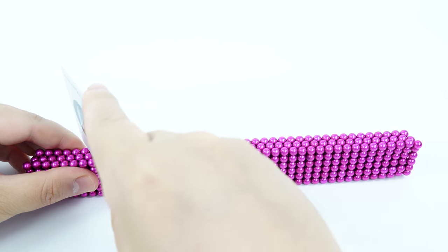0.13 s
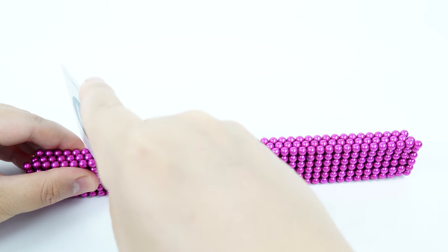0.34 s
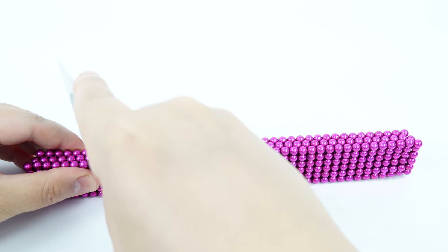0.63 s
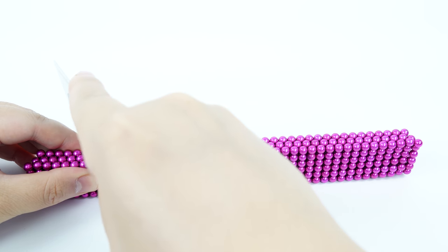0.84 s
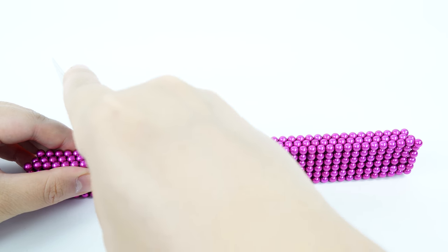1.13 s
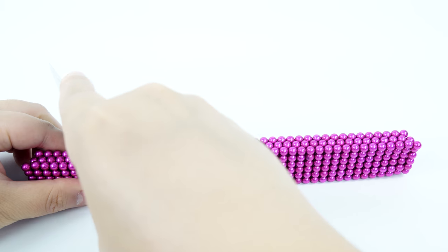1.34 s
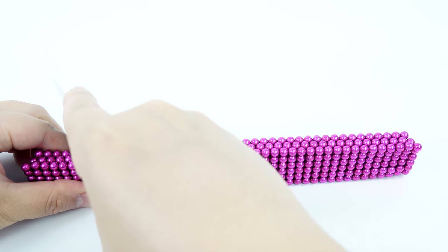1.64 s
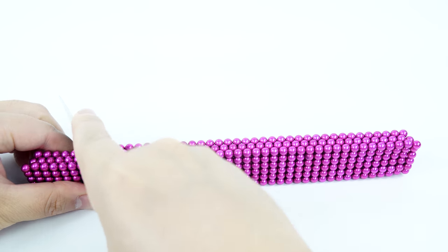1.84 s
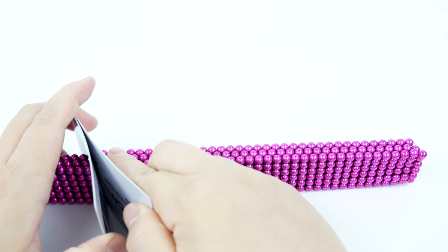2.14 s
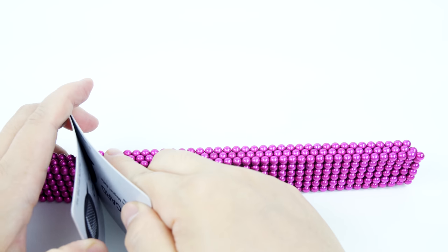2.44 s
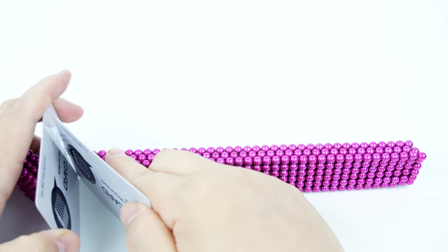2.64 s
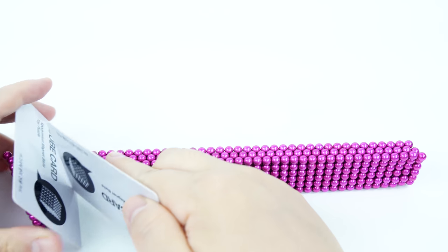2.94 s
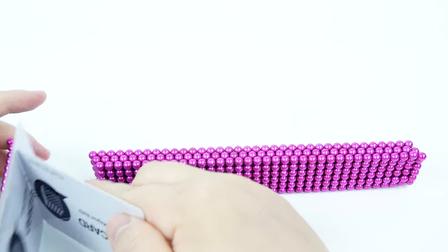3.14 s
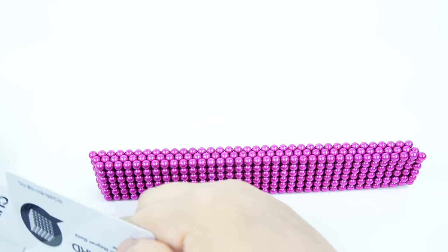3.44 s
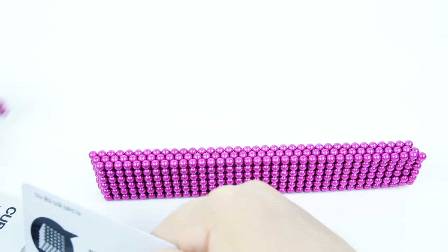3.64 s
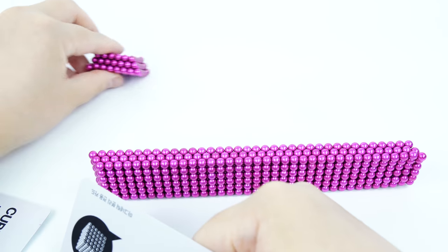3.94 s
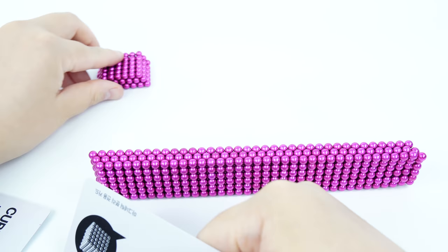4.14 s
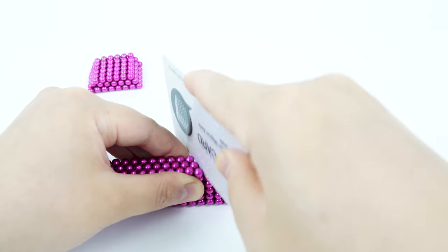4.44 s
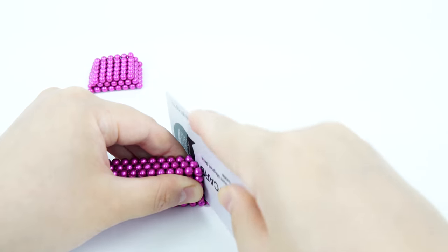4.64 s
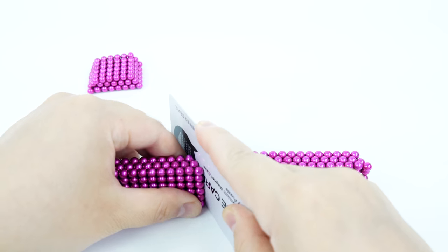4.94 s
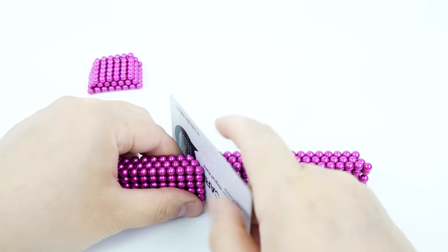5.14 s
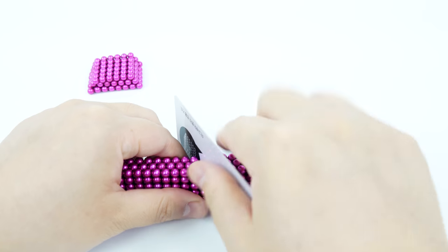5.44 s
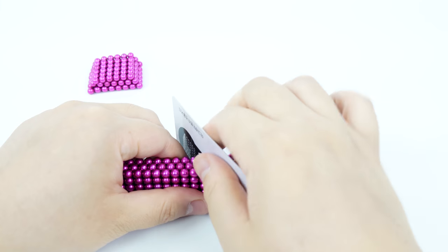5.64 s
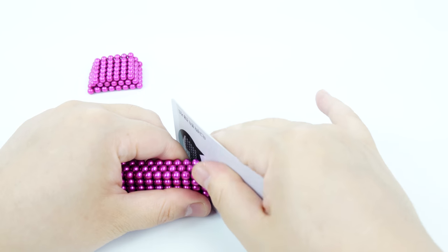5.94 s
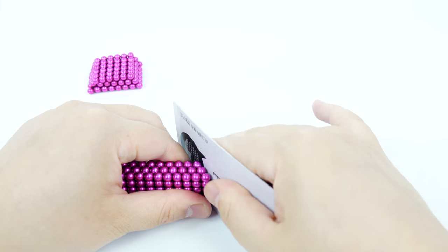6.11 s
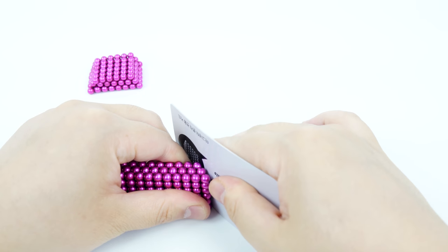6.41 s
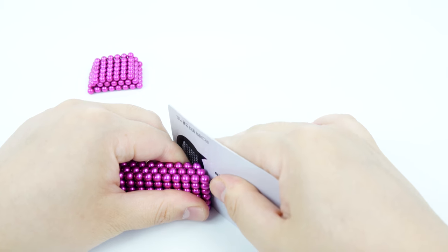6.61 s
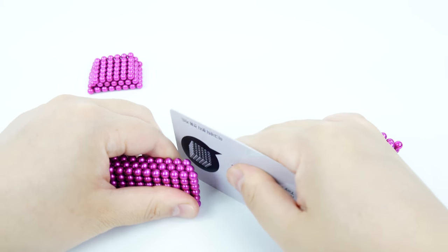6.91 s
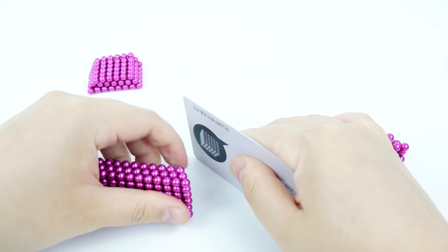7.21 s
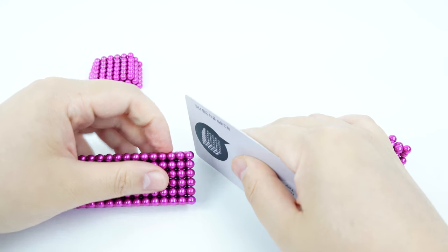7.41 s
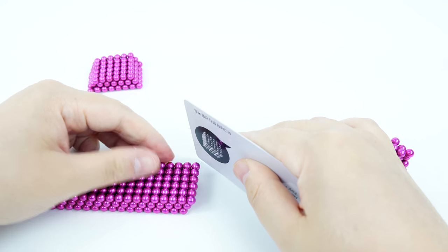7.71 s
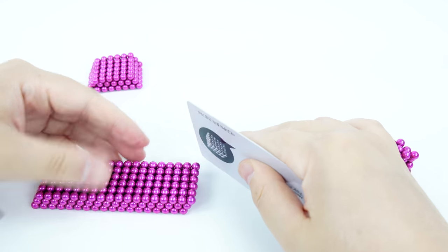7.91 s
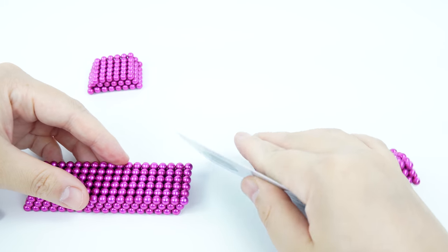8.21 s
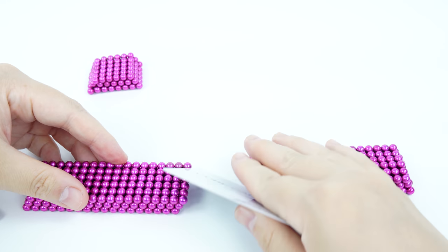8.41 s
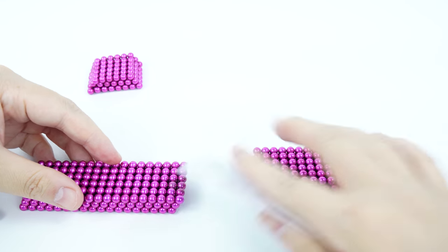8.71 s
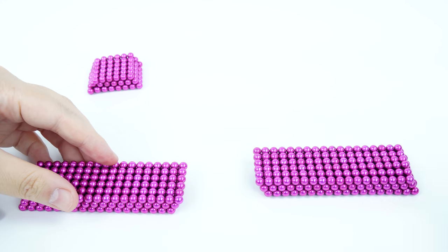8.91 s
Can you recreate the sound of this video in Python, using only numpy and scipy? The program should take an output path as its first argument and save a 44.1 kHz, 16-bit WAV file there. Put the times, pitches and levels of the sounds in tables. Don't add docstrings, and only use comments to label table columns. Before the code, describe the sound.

Close microphone in a small quiet room. Card and skin rustle faintly, then a light knock and a loud crunchy clack as rows of magnetic steel balls part. Soft sliding and small flicks follow, then hard snaps as a piece closes and is set down, a thumping cluster of clacks, a long quiet stretch with tiny ticks, a firm dull knock, and the loudest snap. Light flicks finish it.

```python
import sys
import numpy as np
from scipy import signal
from scipy.fft import rfft, irfft, next_fast_len
from scipy.io import wavfile
from scipy.ndimage import map_coordinates

SR = 44100
rng = np.random.default_rng(int(sys.argv[2]) if len(sys.argv) > 2 else 0)


def elevation(decibels):
    levels = np.asarray(decibels, float)
    return 10 ** (levels / 20)


def log_audio(samples):
    frames = np.atleast_2d(samples).T
    limited = np.clip(frames, -1, 1)
    pcm = np.round(limited * 32767).astype(np.int16)
    wavfile.write(sys.argv[1], SR, pcm)


N = 399546


def unit(x):
    return x / np.sqrt(np.mean(x ** 2) + 1e-20)


def peak(x):
    return x / (np.abs(np.atleast_2d(x)[0]).max() + 1e-20)


def along(points, hz):
    f, v = np.transpose(points)
    return np.interp(np.log(hz + 1), np.log(f + 1), v)


def filtered(x, response):
    m = next_fast_len(x.shape[-1] + 2048)
    spectrum = rfft(x, m) * response(np.fft.rfftfreq(m, 1 / SR))
    return irfft(spectrum, m)[..., :x.shape[-1]]


def resonance(f, hz, width_hz):
    return 1j * f * width_hz / (hz * hz - f * f + 1j * f * width_hz)


def low_pass(f, hz):
    return 1 / (1 + 1j * f / hz) ** 2


def wobble(rate_hz):
    knots = rng.standard_normal(int(N * rate_hz / SR) + 4)
    return map_coordinates(knots, [np.arange(N) * rate_hz / SR])


def moving_band(centre_hz, rel_width, skirt_db, skirt_hz):
    f, t, z = signal.stft(rng.standard_normal(N), SR, nperseg=1024)
    f = f[:, None]
    c = centre_hz[np.minimum((t * SR).astype(int), N - 1)]
    band = np.abs(resonance(f, c, rel_width * c)) ** 2
    skirt = np.abs(resonance(f, skirt_hz, 2 * skirt_hz)) ** 2
    gain = band + elevation(skirt_db) * skirt
    gain = gain / np.sqrt(np.mean(gain ** 2, 0))
    return unit(signal.istft(z * gain, SR, nperseg=1024)[1][:N])


def strokes(rows):
    roundness = 1.2
    t = np.arange(0, N / SR + .01, .001)
    power = 0
    for s, db, *_, rise_s, fall_s in rows:
        away = np.maximum((s - t) / abs(rise_s), (t - s) / abs(fall_s))
        power = power + elevation(db - 20 * away ** roundness) ** 2
    return np.interp(np.arange(N) / SR, t, np.sqrt(power))


def centre(rows):
    s, _, hz, *_ = np.transpose(rows)
    return np.interp(np.arange(N) / SR, s, hz)


def air():
    # pitch_hz, level_db (per Hz)
    air_spectrum = [(11, -26), (18, 1), (49, -8.5), (121, -0.5), (190, -12), (213, -12.5), (300, -7),
                    (410, -12.5), (472, -15), (765, -21), (1050, -24), (1390, -31.5), (1600, -30.5),
                    (3650, -46.5), (16000, -65)]
    level_db = -59
    noise = filtered(rng.standard_normal(N), lambda f: elevation(along(air_spectrum, f)))
    return elevation(level_db + 0.2 * wobble(3)) * unit(noise)


def rustle():
    # peak_s, level_db, rise_s,
    # fall_s
    rustle_strokes = [(.04, -73, 0.24, 0.79), (.3, -78.5, 1, 0.48), (1.34, -76.5, .006, 0.31),
                      (1.52, -72, 0.1, 0.3), (1.874, -78, 0.83, 0.46), (2.07, -72.5, .006, 1.5),
                      (3.17, -72.5, 0.52, 0.45), (3.52, -61.5, 0.28, 0.22), (4.17, -79, 1.6, 0.59),
                      (4.47, -76, .5, .35), (4.71, -67, 0.15, 0.33), (5.1, -86, 0.46, 3.4),
                      (7.1, -94.5, .5, 0.96), (7.9, -81, 0.26, .5), (8.72, -81.5, 0.29, 7.9)]
    hiss = moving_band(np.full(N, 6330), 0.74, skirt_db=9.5, skirt_hz=7000)
    grain = elevation(0.95 * wobble(120) - 3.0)
    return strokes(rustle_strokes) * grain * hiss


def squeaks():
    # start_s, length_s, pitch_hz, width (share of pitch), level_db
    squeak_rows = [(1.357, 0.074, 2296, 0.71, -75), (2.068, 0.26, 2620, 1.3, -78.5),
                   (4.559, 0.083, 410, 0.17, -27.5), (2.998, 0.045, 1470, 0.2, -67),
                   (3.083, 0.11, 1430, 0.53, -60), (3.306, 0.13, 2240, 0.21, -70),
                   (3.379, 0.18, 6600, 0.36, -69.5), (3.18, 0.056, 10300, 0.18, -55),
                   (3.393, 0.12, 10700, .15, -81), (3.484, 0.08, 6900, 0.21, -61),
                   (3.988, 0.059, 1110, .3, -35.5), (4.569, 0.053, 1050, 0.14, -30.5),
                   (4.589, 0.068, 3020, .3, -38.5), (4.705, 0.065, 1500, 0.56, -49),
                   (6.809, .03, 4000, 0.16, -45), (3.57, 0.077, 2160, 0.11, -56.5),
                   (4.793, 0.068, 1890, 0.41, -29.5), (6.283, 0.096, 2715, 0.22, -68),
                   (6.3, 0.078, 1610, 0.71, -68), (6.312, 0.065, 5600, .7, -82),
                   (6.395, 0.036, 5950, 0.42, -86), (6.441, 0.087, 1660, 0.26, -66),
                   (6.44, 0.084, 2840, 0.12, -72.5), (7.9, 0.2, 1380, 0.26, -71.5),
                   (8.081, 0.16, 622, 0.5, -58), (8.087, 0.14, 1360, 0.4, -66),
                   (8.075, 0.15, 2086, 0.35, -71), (8.408, 0.1, 2306, 0.81, -71.5),
                   (8.73, 0.35, 5720, 0.43, -72.5), (8.73, 0.35, 8200, 0.26, -76.5),
                   (8.7, .4, 2167, 1.6, -78.5), (6.811, .06, 1950, .22, -40), (6.815, .07, 6500, .2, -54),
                   (7.995, .075, 1380, .2, -66), (7.995, .07, 2150, .3, -72), (0.0, .12, 1900, .6, -76),
                   (4.54, .2, 12500, .3, -70), (1.43, .1, 13000, .3, -78), (8.57, .16, 12500, .3, -84),
                   (2.55, .12, 12500, .3, -86)]
    catch_s, slip_s = .008, 0.047
    out = np.zeros(N + SR)
    for s, length_s, hz, width, db in squeak_rows:
        n = round(length_s * SR)
        t = np.arange(n) / SR
        tone = unit(filtered(rng.standard_normal(n), lambda f: resonance(f, hz, 1.25 * width * hz) ** 3))
        fade = np.minimum(1, np.minimum(t / catch_s, (length_s - t) / slip_s))
        out[round(s * SR):][:n] += elevation(db) * fade * tone
    return out[:N]


def room_tail(length):
    # pitch_hz, t60_s
    decay = [(100, 0.26), (1000, 0.21), (2500, 0.245), (3800, 0.245), (5200, 0.2), (8000, 0.205),
             (12000, 0.17)]
    # pitch_hz, level_db
    reflected = [(100, -5), (450, -3), (750, -6), (1100, -0.5), (1480, -9.5), (1900, -1), (2500, -3),
                 (8000, -2.5)]
    hz, t, z = signal.stft(rng.standard_normal(length), SR, nperseg=256)
    t60_s = along(decay, hz)[:, None]
    uneven_db = 3.0 * rng.standard_normal((len(hz), 1)) - 0.9
    gain = elevation(uneven_db + along(reflected, hz)[:, None] - 60 * t / t60_s) / np.sqrt(t60_s)
    tail = signal.istft(z * gain, SR, nperseg=256)[1][:length]
    return np.pad(tail, (round(.003 * SR), 0)) * np.sqrt(6 * np.log(10) / SR)


def snaps(rows):
    # pitch_hz, level_db, t60_s
    table_modes = [(238, -1.5, 0.6), (276, 4.5, 0.4), (401, -1.5, 0.4), (448, -6.5, .3), (590, -3, 0.3),
                   (692, -10, 0.25), (775, -9.5, 0.25), (971, -7.5, 0.25), (1119, -7.5, 0.25),
                   (1280, -11.5, 0.25), (1333, -9.5, 0.25), (1618, -14.5, .2), (1710, -14, .2)]
    span, arrival_s = 12288, .0006
    thump_hz, thump_t60_s = 113.7, 0.19
    out = np.zeros(N + 3 * span)
    t = np.arange(span // 2) / SR
    table = np.array([elevation(g - 60 * t / min(0.4 * t60, .2)) * np.sin(-2 * np.pi * hz * t)
                      for hz, g, t60 in table_modes])
    thump = elevation(-60 * t / thump_t60_s) * np.sin(2 * np.pi * thump_hz * t)
    thump *= 1 - np.exp(-t / 0.0025)

    def tick_band(f):
        return (resonance(f, 7100, 2600) ** 2 - 0.8 * resonance(f, 9900, 2400) ** 2) * low_pass(f, 14000)

    def knock_band(f):
        return resonance(f, 360, 1100) ** 2 * low_pass(f, 2500)

    for s, db, ring_hz, thump_db, knock_db, tick_db in rows:
        def block(f):
            ring = resonance(f, ring_hz, 0.35 * ring_hz) + 0.27 * resonance(f, ring_hz, 0.42 * ring_hz)
            return ring * low_pass(f, 2.1 * ring_hz) * low_pass(f, 4 * ring_hz)

        burst = rng.standard_normal(len(t)) * elevation(-60 * t / 0.014)
        burst[:3] -= 2.05
        blow = np.array([burst, np.linalg.norm(burst) * (t == 0)])
        snap = peak(filtered(blow, block))
        tick = peak(filtered(blow * elevation([[0], [-4]] - 60 * t / 0.003), tick_band))
        modes = elevation(2.5 * rng.standard_normal(len(table_modes))) @ table
        knock = peak(0.6 * peak(modes) - peak(filtered(blow[[1, 1]] + 0.36 * blow, knock_band)))
        mix = elevation(-3.5) * snap + elevation(tick_db) * tick + elevation(knock_db - 1.5) * knock
        mix = mix + elevation(thump_db - 2.5) * thump * [[1], [.25]]
        near, spread = elevation(db) * mix
        far = signal.fftconvolve(spread, room_tail(span if db > -45 else span // 3))
        start = round((s + arrival_s) * SR)
        out[start:][:len(near)] += near
        out[start:][:len(far)] += far
    return out[:N]


def contacts():
    # start_s, snap_db, ring_hz, thump_db, knock_db
    touch_rows = [
        (0.59, -62, 5000, -40, -20),
        (0.0244, -49, 7000, -30.5, -28),
        (1.4321, -33, 1300, 10.5, 10.5),
        (1.9228, -45.5, 2900, 12, 4.5),
        (3.5964, -48, 8960, 1, -16),
        (4.5395, -35.5, 1710, 20, 17),
        (5.0364, -55.5, 6500, -8, 7.5),
        (8.4624, -58, 1604, -12.5, 8),
    ]
    # start_s, snap_db, ring_hz
    flick_rows = [(1.4325, -37, 4460), (1.9232, -41.5, 13730), (3.5947, -40, 11000), (3.6005, -53, 11500),
                  (2.5456, -39.5, 5630), (2.729, -59, 4460), (3.5593, -26, 5030), (3.5682, -27, 5350),
                  (3.569, -31, 10800), (3.6794, -48.5, 5240), (8.4931, -47, 6600), (8.5749, -34.5, 6030),
                  (8.577, -44, 3480), (8.6867, -25.5, 5320), (8.688, -54, 3420), (3.209, -35, 6000),
                  (3.2435, -37.5, 7000), (3.5597, -34, 11000)]
    # start_s, snap_db, ring_hz, thump_db, knock_db
    pad_rows = [
        (1.4245, -44, 345, 18, -25),
        (1.785, -45.5, 499, 4.5, -21.5),
        (4.5325, -34.5, 444, 7.5, -6),
        (4.5625, -21, 586, 7, -8),
        (4.7808, -42, 398, 12.5, -17.5),
        (6.793, -49, 1600, -10, -0.5),
        (6.8035, -40.5, 1490, -17.5, 11),
        (6.838, -30, 2100, -27, 12.5),
    ]
    # start_s, snap_db, ring_hz, thump_db, knock_db
    clack_rows = [(1.4696, -37.5, 2900, 2.5, 10), (1.7945, -18, 2450, -0.5, -4),
                  (1.8113, -7, 4810, -16, -7), (3.1692, -19.5, 1950, -52, -7.5),
                  (3.9871, -8, 1900, -24.5, -4), (4.1826, -7.5, 450, -14, -6), (4.5735, -28, 1066, -1, 2),
                  (4.5775, -16.5, 2920, 4.5, 3.5), (4.5824, -16, 2800, -18.5, -3),
                  (4.6014, -20.5, 2400, 0, -8), (4.7075, -28.5, 1890, -2.5, -5.5),
                  (4.718, -40, 1960, -3, -2), (4.7939, -12.5, 1840, -14.5, -21),
                  (4.799, -15, 1770, -16, -32), (4.8064, -13.5, 1903, -8, -29),
                  (6.8124, -24, 1982, -38, -6), (7.666, -7, 1400, -7.5, 3.5),
                  (7.6757, -7.5, 1300, -12, -4.5)]
    # start_s, snap_db, ring_hz, thump_db, knock_db
    snap_rows = [(1.8064, -24, 2600, -5, -5), (1.8174, -15, 5230, -19, -15), (3.2071, -34, 1450, -29, -22),
                 (3.2198, -35.5, 3020, -17, 7), (3.2424, -40, 1520, -21, -7),
                 (4.1808, -13.5, 4530, -21, -7.5), (4.1824, -3, 2660, -21, -8),
                 (4.5921, -17, 2750, -8.5, -1.5), (7.654, -8, 2300, -12.5, 0),
                 (7.66, -16.5, 1000, -12.5, -0.5), (7.657, -20.5, 2500, -14, -4),
                 (7.6613, 2, 2810, -5.5, -6.5)]
    # start_s, snap_db, ring_hz
    shift_rows = [(2.0694, -57.5, 1340), (2.316, -66, 4100), (2.6024, -60.5, 1434), (2.6194, -46, 1900),
                  (2.83, -54.5, 1423), (4.3744, -59.5, 1608), (5.1744, -62.5, 5480), (5.1886, -54, 1356),
                  (5.24, -51, 1589), (6.2836, -55, 2910), (6.3175, -56.5, 6230), (6.3294, -56, 2910),
                  (6.3979, -55, 6000), (6.4428, -49, 1670), (6.4687, -59, 1650), (6.5004, -61.5, 5960),
                  (6.5854, -67, 2780), (8.4103, -55, 2190), (6.7785, -56, 1560), (3.855, -63, 4960),
                  (3.282, -62, 7500), (3.31, -50, 6500)]
    # the missing ones of thump_db, knock_db, tick_db
    kinds = [(snap_rows, [-16]), (clack_rows, [-29.5]), (touch_rows, [-6]),
             (flick_rows, (-20.5, -14, -15.5)), (shift_rows, (-2.5, 6, -10.5)), (pad_rows, [-37])]
    return snaps([(*row, *mix) for rows, mix in kinds for row in rows])


def small_contacts():
    # start_s, snap_db, ring_hz, knock_db
    small_rows = [(3.9888, -20, 1150, -8), (3.9888, -38, 8900, -20), (3.9928, -28, 5100, -20),
                  (3.9932, -40, 8900, -20), (3.9995, -22, 900, 0), (3.9995, -42, 10500, -20),
                  (1.4325, -40, 6400, -20), (1.434, -36, 2000, -15), (1.4696, -50, 6700, -20),
                  (1.4765, -56, 6700, -20), (7.6618, -26, 9800, -20), (7.66, -13, 600, -4),
                  (1.8005, -40, 6000, -20), (1.8075, -36, 6900, -20), (4.1812, -30, 8200, -20),
                  (2.316, -60, 4100, -20), (4.578, -36, 9700, -20), (4.5827, -38, 9900, -20),
                  (4.5932, -40, 9700, -20), (4.5635, -38, 2800, -20), (4.5705, -44, 6000, -20),
                  (4.533, -56, 6000, -20), (0.0244, -48, 4800, -20), (7.669, -14, 1600, -3),
                  (8.255, -60, 200, 6), (3.9935, -30, 4300, -20), (4.5395, -44, 13500, -20),
                  (4.578, -40, 13500, -20), (1.4325, -48, 13500, -20), (1.4696, -52, 13000, -20),
                  (7.6618, -34, 13000, -20), (1.9228, -46, 3000, -6)]
    thump_db, tick_db = -30, -30
    return snaps([(s, db, hz, thump_db, knock_db, tick_db) for s, db, hz, knock_db in small_rows])


def drags():
    # peak_s, level_db, centre_hz, rise_s, fall_s
    drum_strokes = [(1.81, -29, 280, 0.022, 0.024), (1.924, -32, 194, 0.0035, 0.061),
                    (2.625, -43, 267.8, 0.021, 0.16), (2.695, -38.5, 236, 0.092, 0.04),
                    (3.18, -37, 235, 0.0064, 0.19), (3.356, -36.5, 247, 0.088, 0.089),
                    (3.605, -35.5, 224.1, 0.043, 0.02), (4.066, -35.5, 310.9, 0.084, 0.043),
                    (4.154, -34.5, 324.7, 0.042, 0.046), (4.2, -22, 400, 0.014, 0.03),
                    (4.306, -34.5, 298, 0.076, 0.061), (4.545, -27, 210.7, 0.012, 0.03),
                    (4.58, -20, 225, 0.026, 0.018), (5.196, -55.5, 263.7, 0.031, 0.073),
                    (6.404, -54, 291, 0.02, 0.064), (6.478, -58, 270, 0.077, .06),
                    (6.825, -31, 300, 0.019, 0.16), (6.87, -24.5, 350, 0.048, 0.079),
                    (7.35, -44.5, 220, 0.052, 0.11), (7.97, -59, 260, 0.098, 0.18),
                    (8.265, -43.5, 330, 0.029, 0.16), (8.31, -40, 240, 0.083, 0.085)]
    # peak_s, level_db,
    # centre_hz, rise_s, fall_s
    scrape_strokes = [(1.81, -29, 1578, 0.0075, 0.033), (2.622, -48, 1082, 0.019, 0.087),
                      (3.18, -45, 1641, 0.012, 0.15), (3.6, -59, 2214, 0.19, 0.12),
                      (4.03, -40, 1550, 0.039, 0.049), (4.2, -38.5, 2143, 0.0054, 0.1),
                      (4.545, -38, 881, 0.0053, .06), (4.585, -30.5, 958, 0.026, 0.027),
                      (5.196, -70, 1140, 0.03, .035), (5.238, -66, 1152, 0.005, 0.033),
                      (6.43, -67, 1494, 0.086, 0.047), (6.83, -39.5, 1940, 0.033, .06),
                      (6.86, -38.5, 1302, 0.034, 0.084), (7.72, -39, 1496, .04, 0.12),
                      (7.96, -69, 1180, 0.38, 0.24), (8.14, -66.5, 1219, 0.059, .08)]
    # peak_s, level_db, rise_s, fall_s
    push_strokes = [(1.48, -39, 0.065, 0.069), (1.79, -25, 0.0074, 0.038), (1.922, -26.5, 0.0097, 0.051),
                    (3.3, -44.5, 0.016, 0.24), (3.42, -43.5, 0.18, .13), (3.6, -45, 0.21, .09),
                    (4.16, -38, .025, .15), (4.57, -49.5, 0.053, .13), (6.862, -67, 0.058, .11),
                    (7.02, -57.5, 0.26, 0.31), (7.33, -64, .06, .15), (8.34, -59, 0.19, 0.068)]
    drum_hz = centre(drum_strokes)
    stick_slip_hz = drum_hz * (1 + 0.13 * wobble(45))
    stutter = np.sin(2 * np.pi * np.cumsum(stick_slip_hz) / SR)
    drum_noise = moving_band(drum_hz, 0.69, skirt_db=-32.0, skirt_hz=337)
    drum = unit(elevation(2.0 * wobble(50)) * stutter + 0.91 * drum_noise)
    scrape_noise = moving_band(centre(scrape_strokes), 0.77, skirt_db=-31.5, skirt_hz=4000)
    scrape = unit(elevation(0.51 * wobble(130)) * scrape_noise)
    push = unit(filtered(rng.standard_normal(N), lambda f: resonance(f, 54, 32) ** 2))
    low = filtered(strokes(drum_strokes) * drum, lambda f: low_pass(f, 1200))
    high = filtered(strokes(scrape_strokes) * scrape, lambda f: low_pass(f, 7000))
    return low + high + strokes(push_strokes) * push


def zips():
    # peak_s, level_db, centre_hz, rise_s, fall_s
    zip_strokes = [
        (1.815, -24, 5290, 0.0052, 0.048),
        (3.21, -43, 5550, 0.032, 0.062),
        (3.28, -55, 6780, .02, 0.045),
        (3.244, -50, 5970, .03, .05),
        (3.57, -42, 5406, .012, .03),
        (3.594, -60, 5310, .02, 0.066),
        (4.607, -36.5, 3100, .025, 0.065),
        (6.83, -46.5, 6320, .03, 0.057),
        (7.668, -30.5, 3200, 0.0046, 0.1),
    ]
    noise = moving_band(centre(zip_strokes), 0.53, skirt_db=-15.5, skirt_hz=5030)
    crunch = unit(elevation(3.2 * wobble(400)) * noise)
    return filtered(strokes(zip_strokes) * crunch, lambda f: low_pass(f, 8490))


def scene():
    def microphone(f):
        return low_pass(f, 17000) * (f < 15900) * 1j * f / (35 + 1j * f)

    sources = rustle() + squeaks() + contacts() + small_contacts() + drags() + zips()
    near = filtered(sources, microphone)
    return filtered(near + air(), lambda f: 1j * f / (30 + 1j * f))[None]


def band_limit(x):
    return signal.sosfilt(signal.butter(12, 16480, fs=SR, output="sos"), x)


def record(dry):
    top = .97
    mix = dry / (1 + np.abs(dry / top) ** 8) ** (1 / 8)
    return band_limit(mix)


dry = scene()
out = record(dry)
log_audio(out)
```